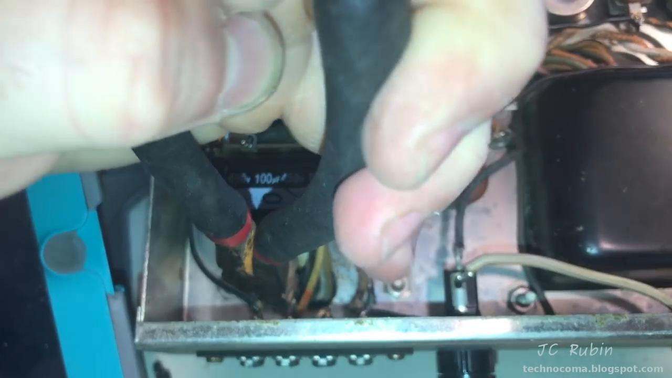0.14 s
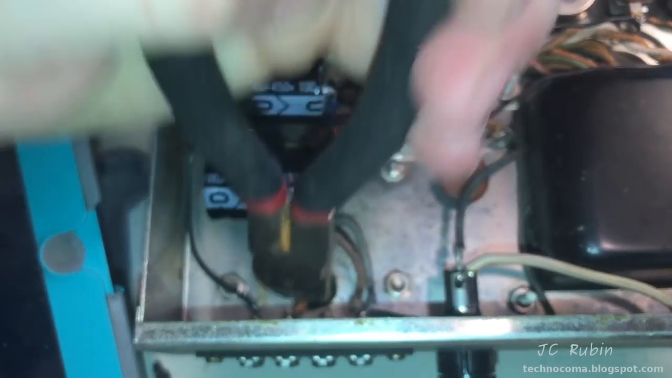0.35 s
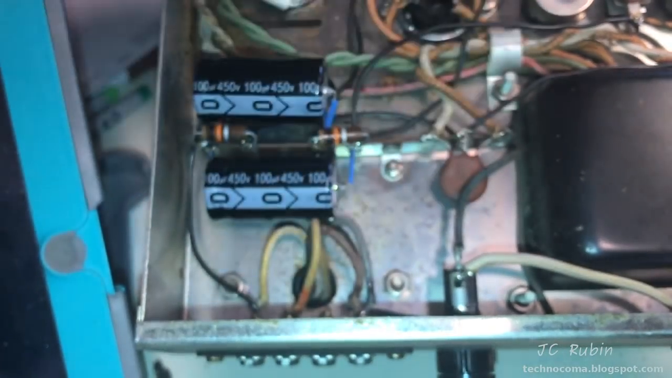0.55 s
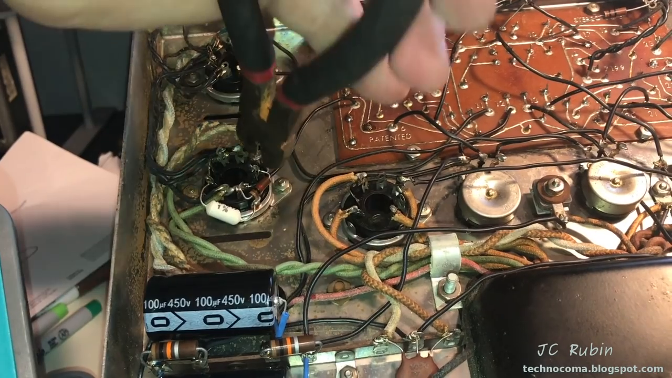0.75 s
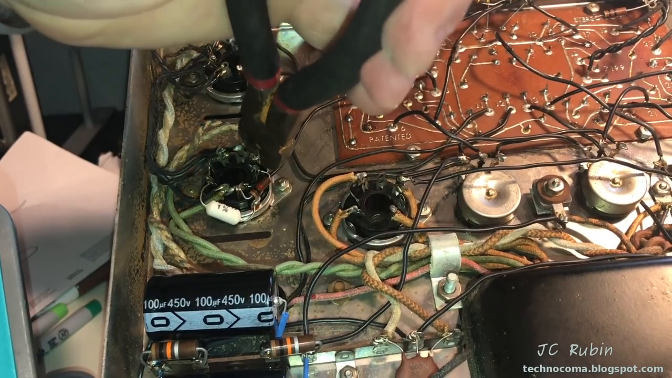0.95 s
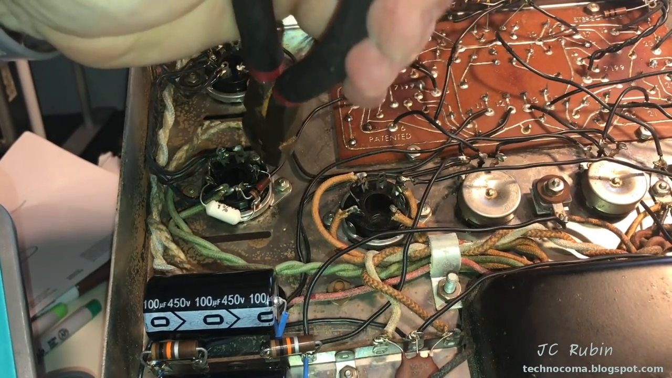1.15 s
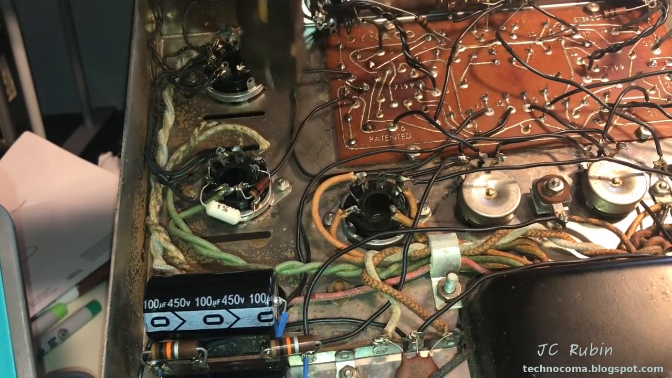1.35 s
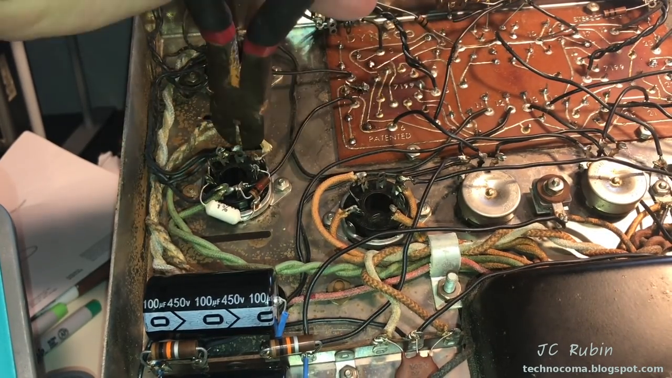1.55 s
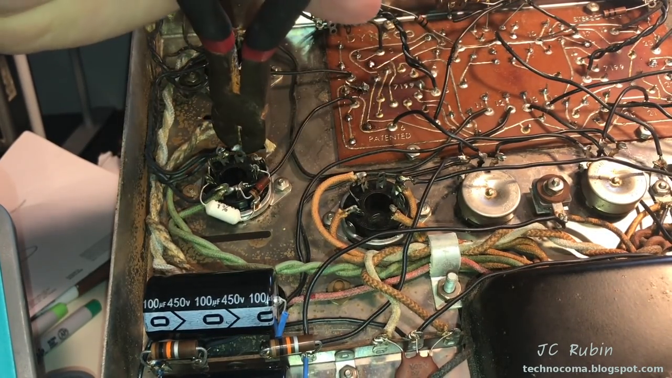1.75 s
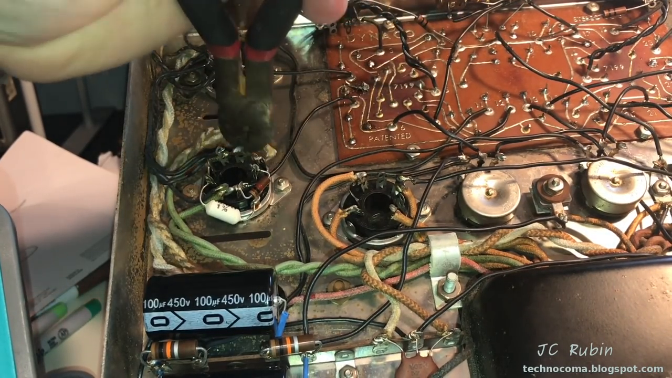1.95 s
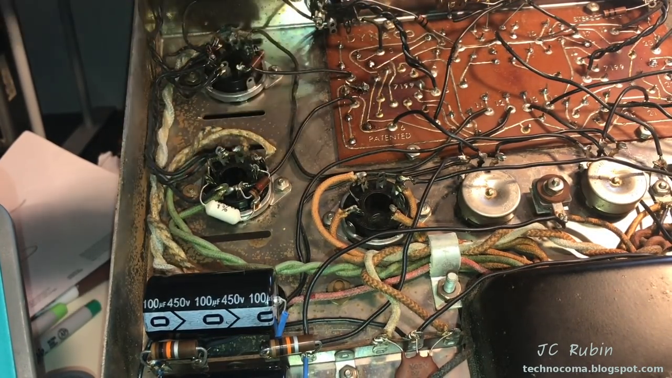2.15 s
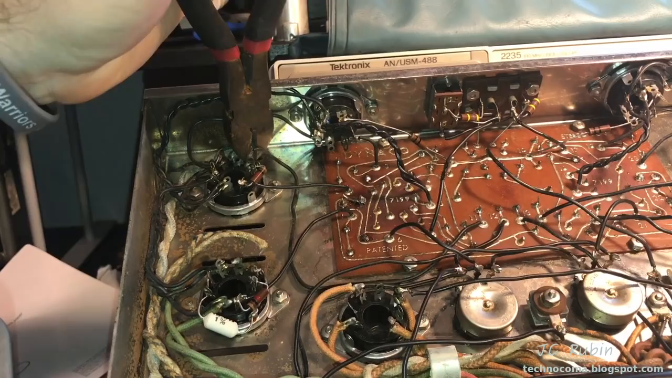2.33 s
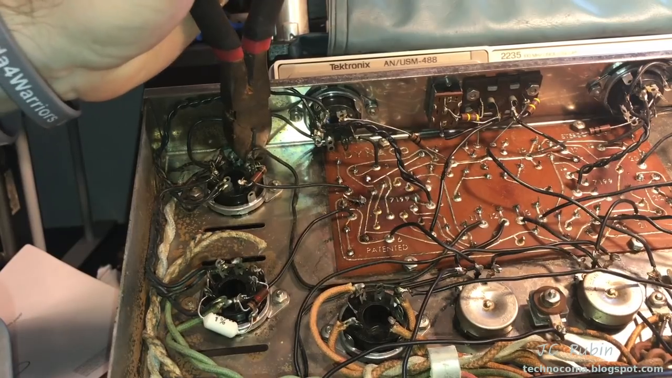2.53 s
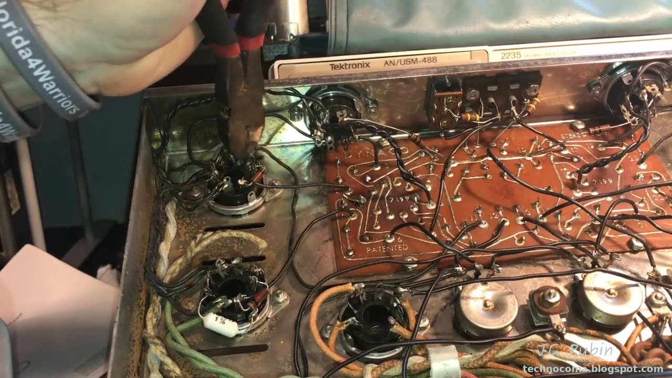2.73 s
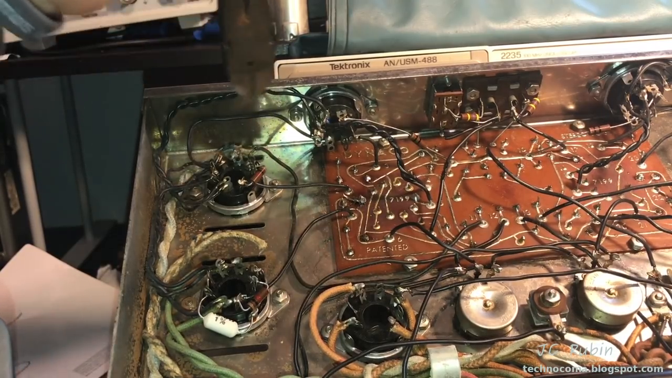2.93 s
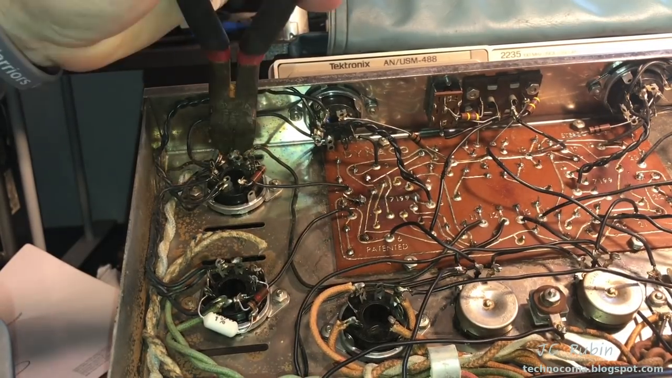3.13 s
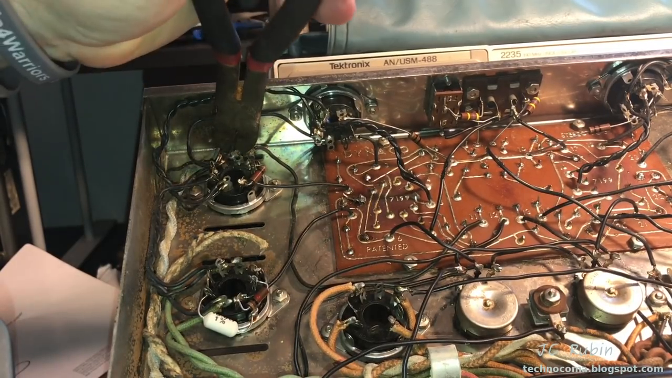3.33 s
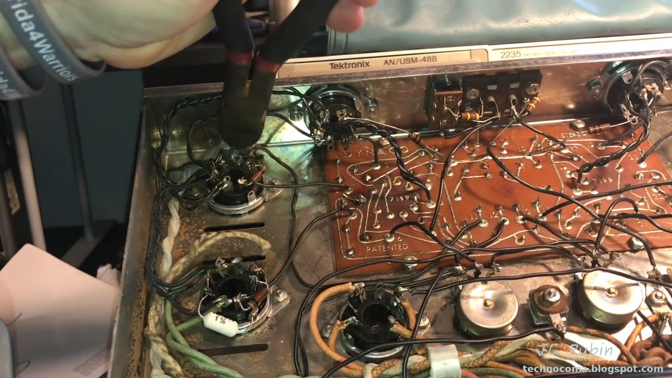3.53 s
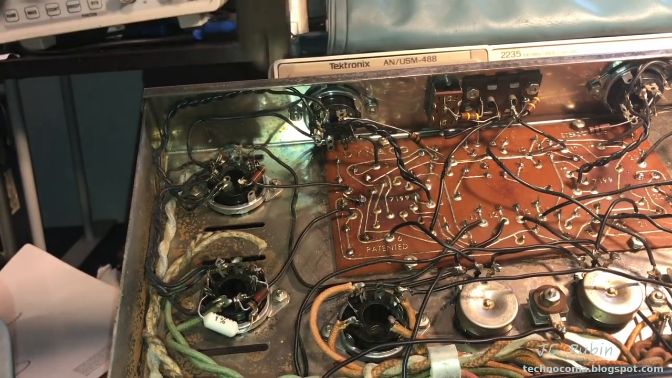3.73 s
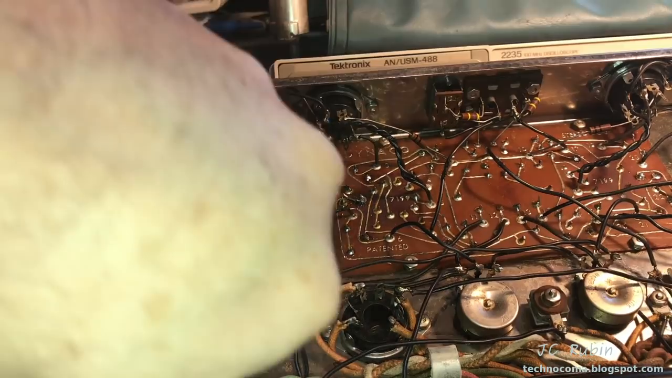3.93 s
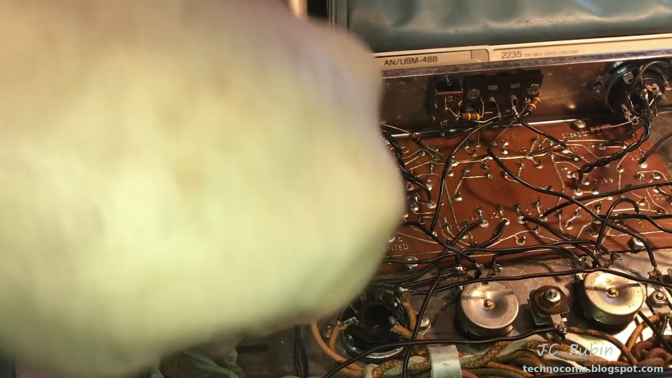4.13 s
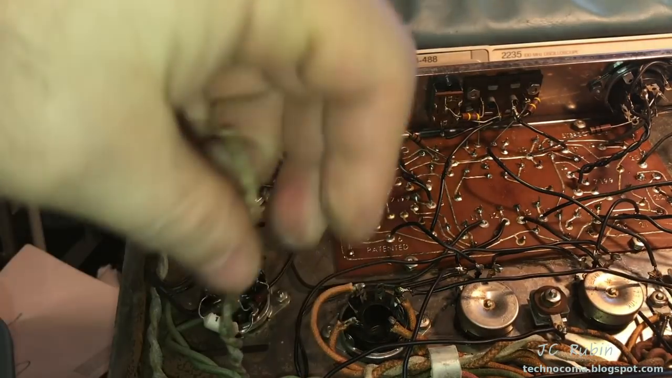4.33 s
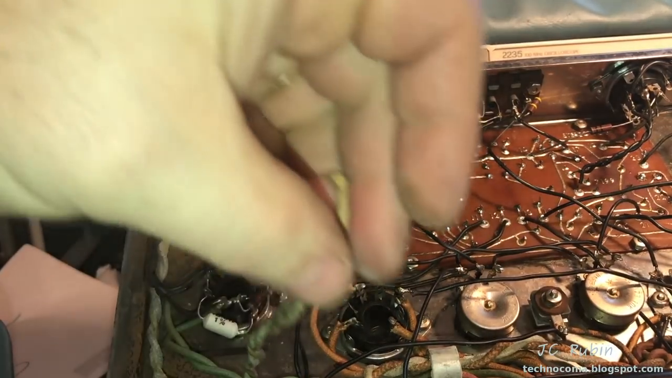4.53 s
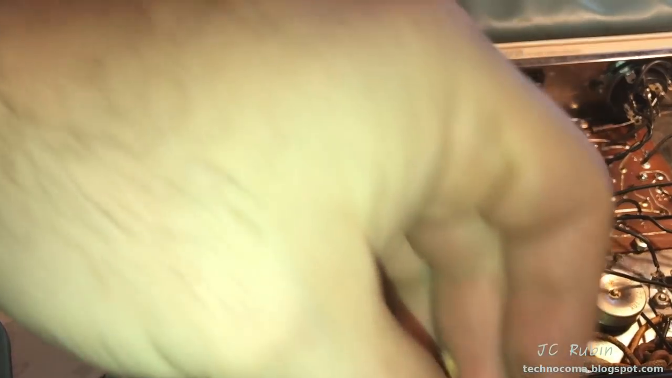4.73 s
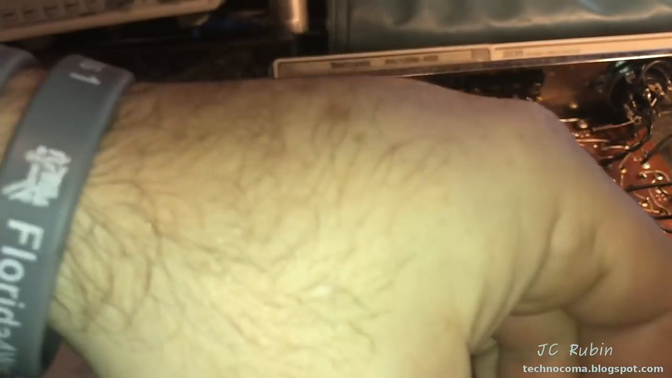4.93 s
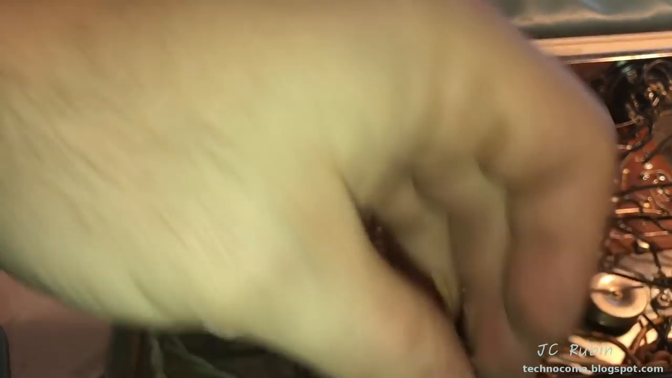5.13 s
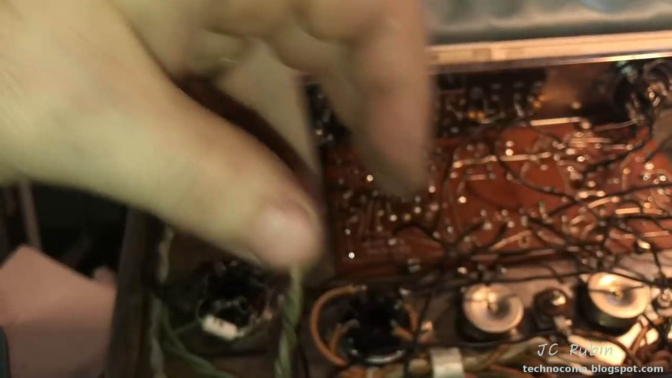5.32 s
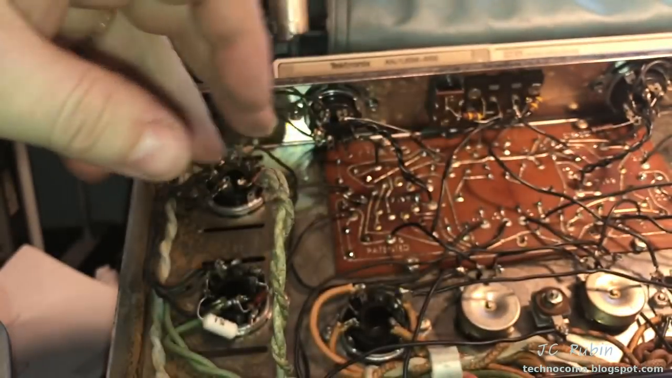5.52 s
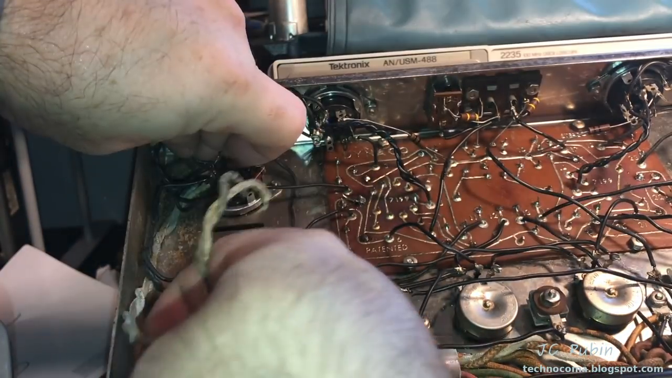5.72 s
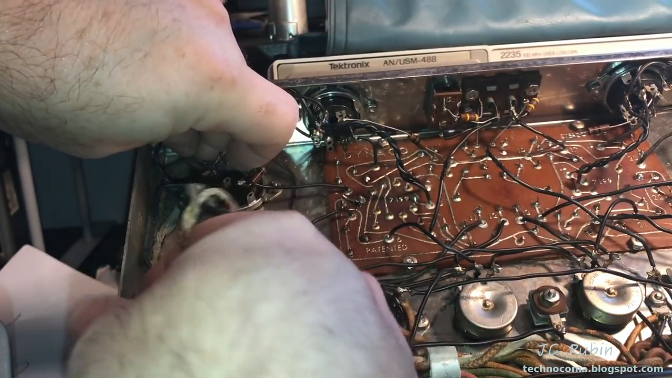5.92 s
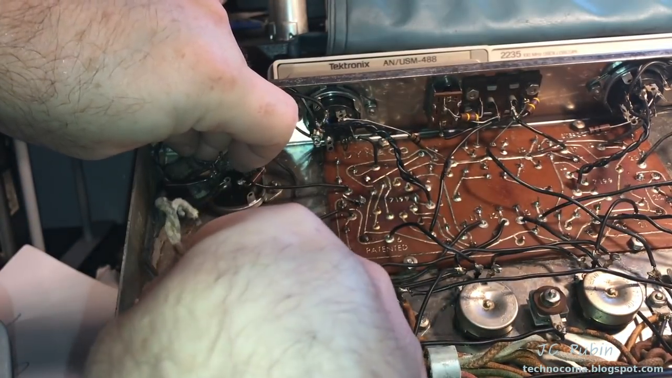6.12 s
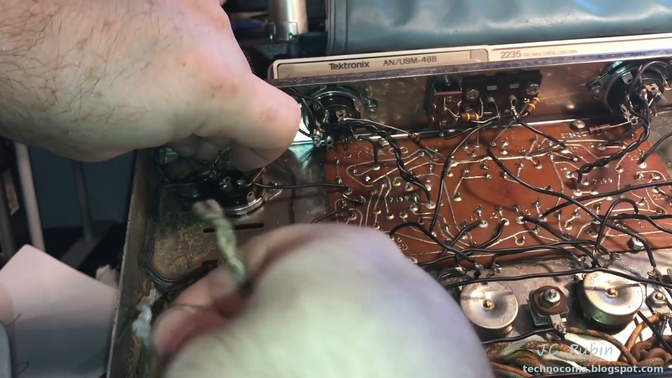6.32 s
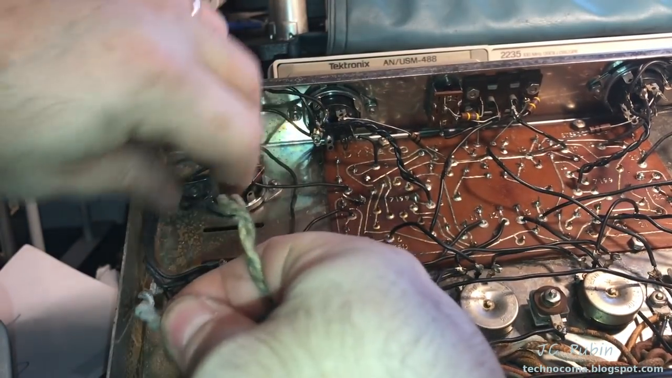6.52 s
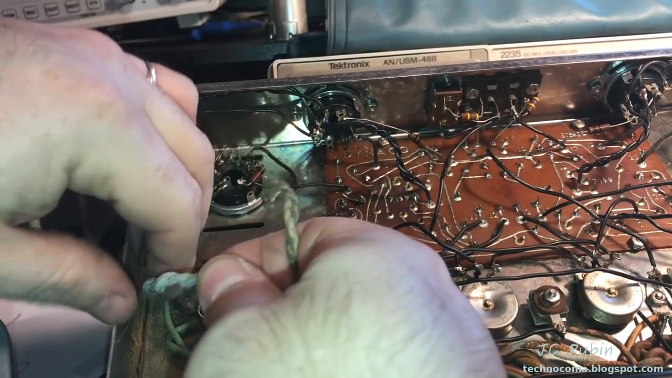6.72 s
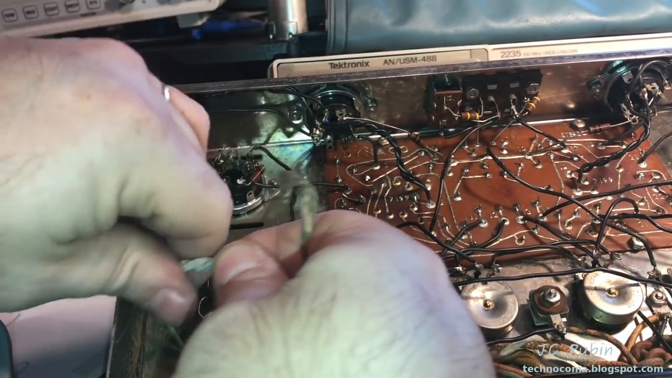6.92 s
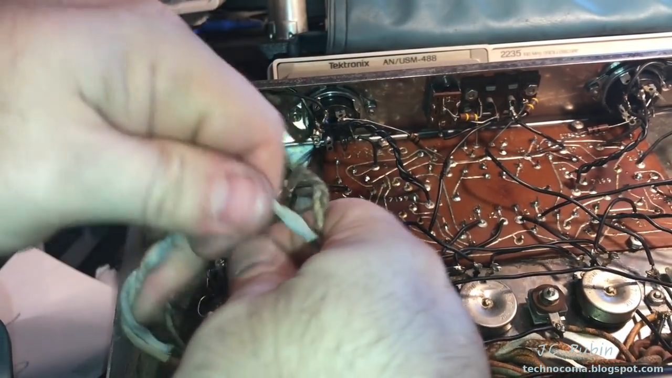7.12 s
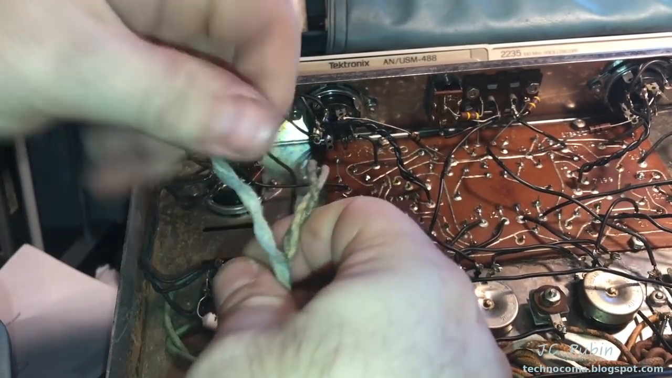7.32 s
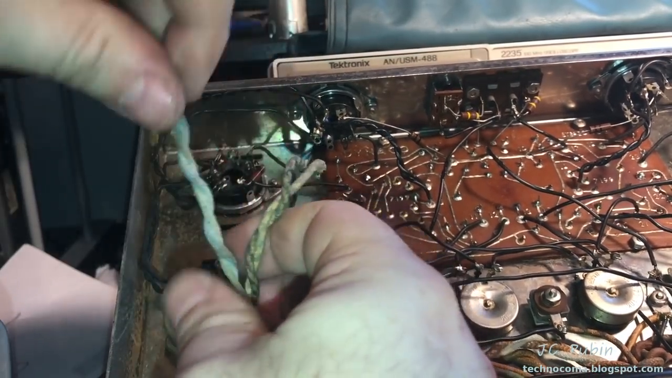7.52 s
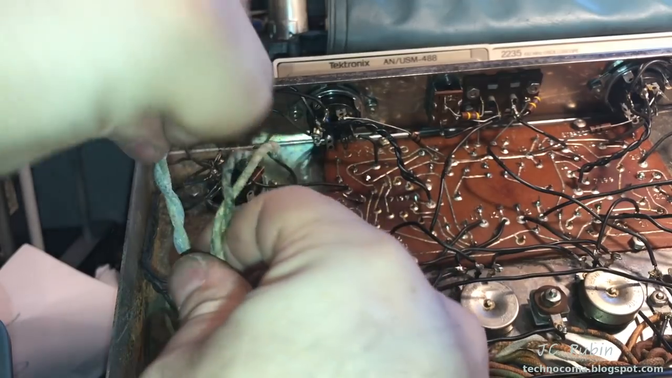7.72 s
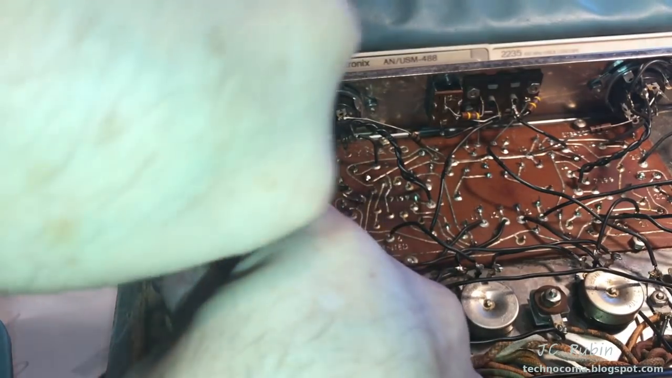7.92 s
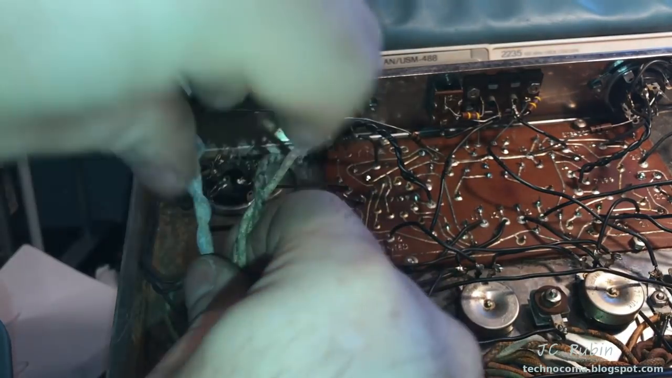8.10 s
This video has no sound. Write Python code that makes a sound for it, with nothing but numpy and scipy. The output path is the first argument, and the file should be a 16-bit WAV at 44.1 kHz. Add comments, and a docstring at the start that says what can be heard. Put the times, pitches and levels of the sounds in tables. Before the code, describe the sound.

Close-up side cutters click crisply through wires five times, followed by irregular metallic snaps, rubs and small knocks over faint mains hum.

```python
"""Snipping and pulling wires

Side cutters snip five wires in an open metal chassis on a workbench, close to a small microphone.
Fingers then pull the stiff twisted wires free: they snap, tick, scrape, twang and sing on the metal.
Blows are noise bursts and kicks through ringing modes, rubs are grains, twangs are beating sines.
Shudders of the bench, a small room's noise tails, mains hum, room air and a stepping hiss lie below.
"""
import sys
import numpy as np
from scipy import signal
from scipy.io import wavfile
from scipy.ndimage import uniform_filter1d

SR = 44100
rng = np.random.default_rng(int(sys.argv[2]) if len(sys.argv) > 2 else 0)


def transcribe(u):
    """Save the signal u as a 16-bit wav file named by the first command-line argument.

    u: samples, shape (n,) or (channels, n), limited to [-1, 1]; the rate is SR.
    q: integer samples, one column per channel.
    """
    v = np.clip(np.atleast_2d(u).T, -1, 1)
    q = np.round(v * 32767).astype(np.int16)
    wavfile.write(sys.argv[1], SR, q)


N = 364261  # length in samples

# Five snips: t/s, jaws/dB, bite/dB, clatter/dB, crack/dB, thump/dB, panel/dB, fall/ms, room/dB
# (bite, clatter and crack are relative to the jaws; room is relative to the whole blow)
CUTTER_SNIPS = [(0.2674, -13.5, -6, -2.5, -9.5, -23, -31, 3.7, -13),
                (1.1606, -18, 6.5, -8, 4, -31, -27.5, 1.9, -7.5),
                (2.0128, -19, 7.5, -11.5, -4, -31.5, -34.5, 1.87, -11),
                (2.7526, -17, 0.5, -0.5, -2, -39.5, -35, 1.9, -7),
                (3.58, -17.5, 5.5, -2.5, -3, -31, -41, 1.4, -9.5)]
HANDLES_DB, HANDLES_PER_BITE = -6, 0.99  # a harder bite rings the handles more
PIVOT_DB, TIPS_DB = -1.5, 2  # both follow the clatter
SNIP_RISE_MS = 0.3


def snips():
    """Spreads the shock of each cut over the cutters' parts, the panel and the crack in the air."""
    events = []
    for s, jaws, bite, clatter, crack, thump, panel, fall_ms, room_db in CUTTER_SNIPS:
        handles = jaws + HANDLES_DB + HANDLES_PER_BITE * bite
        pivot = jaws + clatter + PIVOT_DB
        tips = jaws + clatter + TIPS_DB
        edges = jaws + bite
        air_crack = jaws + crack
        events.append((s, jaws, thump, panel, handles, pivot, tips, edges, air_crack,
                       SNIP_RISE_MS, fall_ms, room_db))
    return events


# A strained wire tears free:
# t/s, level/dB, tilt/(dB per octave), clink/dB, panel/dB, extra crack/dB, fall/ms
WIRE_SNAPS = [(4.9797, -40, -3.5, -38, -36, -3.5, 4.04), (5.694, -28.5, -2.5, -41.5, -37.5, 4.5, 3.83),
              (6.2629, -23.5, 5.5, -14, -36.5, -5, 2.6), (6.4847, -42, -1.5, -51, -41.5, -3, 4.25),
              (6.9008, -52, -5, -43, -47, 2, 7), (7.0672, -37.5, -3, -36.5, -39.5, -4, 3.14),
              (7.1347, -25, 0, -21, -24.5, 5, 5.85)]
SNAP_RISE_SHARE = 0.46  # rise as a share of the fall time
SNAP_THUMP_DB, SNAP_TICK_DB, SNAP_ROOM_DB = -19, 2, -9.5  # thump is relative to the panel


def snaps():
    """A torn wire lets its strain go as one shock through all chassis parts; the rise follows the fall."""
    events = []
    for s, db, tilt, clink, panel, crack, fall_ms in WIRE_SNAPS:
        part_db = spread(db, tilt, clink, panel + SNAP_THUMP_DB, panel, SNAP_TICK_DB, crack)
        events.append((s, *part_db, SNAP_RISE_SHARE * fall_ms, fall_ms, SNAP_ROOM_DB))
    return events


# Wires and tool knock the chassis: t/s, level/dB, tilt/(dB per octave), panel/dB, room/dB
CHASSIS_KNOCKS = [(0.054, -59, 1, -85, -8), (0.085, -64.5, -1.5, -78, -23), (0.436, -52, -1.5, -57, -3),
                  (0.7433, -78, -9, -54.5, -22), (0.7902, -75, -3, -61.5, 5), (0.8458, -54.5, -5, -44, 0),
                  (0.9397, -74, -11, -66, -16), (1.3456, -44.5, -0.5, -49, 4),
                  (1.8004, -63.5, -3, -56.5, 0), (2.151, -57, 0, -69, -13),
                  (2.8466, -36.5, -1.5, -43.5, -6), (3.2626, -59, 7, -79, -14),
                  (3.692, -46.5, -0.5, -56, -3.5), (4.489, -65, -1.2, -54.5, -18.5),
                  (5.2385, -67, -4, -59, -17), (5.4514, -63, -4, -52.5, -2), (5.475, -55.5, -3, -56, -27),
                  (5.4779, -57.5, -3, -41.5, -3.5), (5.7541, -39.5, -1.3, -46, -9.5),
                  (5.773, -46.5, -6.5, -47.5, -2), (5.8042, -57, -0.5, -45.5, -1), (5.856, -67, -7, -56, 0),
                  (5.8261, -67, -5, -49, -12), (5.9071, -61.5, 0.4, -66, -1), (5.94, -65.5, -3.5, -54, 0.5),
                  (6.03, -67, -4, -63, 2.5), (6.1846, -48, -7.5, -48.5, 6.5), (6.4218, -55, -8, -46, 4),
                  (6.6329, -61.5, -0.5, -53, -4), (6.673, -71, -2, -53, -9), (6.6847, -62, 1, -54, -4),
                  (6.7162, -63.5, 1.2, -57.5, 9.5), (6.9702, -71, -8, -59, -3), (7.0096, -64, 1, -55, -2),
                  (7.118, -55, 4.5, -60, -12), (7.2491, -47.5, -1.5, -44, -6.5), (7.384, -61, -7, -53, -2),
                  (7.4888, -56.5, -3, -48, -15), (7.6896, -47, -4, -48, -7),
                  (7.9431, -59.5, -3.5, -78, -10), (8.0533, -65.5, -10, -56, 0),
                  (8.1083, -63, 2, -75, -4.5), (8.145, -71, 9, -77, -11)]
KNOCK_RISE_MS, KNOCK_FALL_MS, TICK_DB = 0.8, 3.1, 1
KNOCK_CLINK_DB, KNOCK_THUMP_DB = -5.5, -7.5  # clink relative to the level, thump to the panel
FAINT_DB, FAINT_SPREAD_DB, FAINT_ROOM_DB = -67.5, 0.5, -2.5  # scattered faint knocks


def knocks(faint_count):
    """Short contacts shake the chassis parts: the placed knocks plus a random scatter of faint ones."""
    faint = []
    for _ in range(faint_count):
        s = 0.05 + rng.random() * (N / SR - 0.2)
        a, b, c = rng.standard_normal(3)
        level = FAINT_DB + FAINT_SPREAD_DB * a
        panel = FAINT_DB + 4 + FAINT_SPREAD_DB * c
        faint.append((s, level, -2.5 + 1.5 * b, panel, FAINT_ROOM_DB))
    events = []
    for s, db, tilt, panel, room_db in CHASSIS_KNOCKS + faint:
        part_db = spread(db, tilt, db + KNOCK_CLINK_DB, panel + KNOCK_THUMP_DB, panel, TICK_DB, 0)
        events.append((s, *part_db, KNOCK_RISE_MS, KNOCK_FALL_MS, room_db))
    return events


# Chassis modes, grouped as rattle, thump, panel, clink, tick, air crack: f/Hz, width/Hz, level/dB
CHASSIS_PARTS = [
    [(1529, 100, -2.5), (2523, 780, 6)],
    [(245, 4.8, -1), (296.3, 320, -2), (477.2, 11, -6.5)],
    [(630, 260, -6.5), (910, 21, -4), (1000, 49, -3.5), (1250, 68, -3)],
    [(3000, 77, -0.5), (3450, 650, -1)],
    [(4330, 710, -3.5), (5760, 1200, -4), (6800, 860, -5.5)],
    [(8600, 1700, 0), (12400, 1900, 0.5), (14600, 3900, -8.5)],
]
TILT_HZ = 3993  # pivot of the tilted line


def spread(db, tilt, clink_db, thump_db, panel_db, tick_db, crack_db):
    """Levels of the chassis parts: rattle, tick and crack start from one line tilted over pitch."""
    def on_line(part):
        centre_hz = np.mean([mode[0] for mode in CHASSIS_PARTS[part]])
        return db + tilt * np.log2(centre_hz / TILT_HZ)
    return on_line(0), thump_db, panel_db, clink_db, on_line(4) + tick_db, on_line(5) + crack_db


def blows(events, parts):
    """Each blow is a short rough push that rings every part, and the room answers in the same colour."""
    t_ms = np.arange(4000) / SR * 1000
    push = np.zeros((len(parts), 1, N + 4000))
    echo = np.zeros(N + SR)
    hz = np.fft.rfftfreq(512, 1 / SR)
    colours = np.array([colour(modes, hz) for modes in parts])
    quick = np.array([[(modes[0][0] / 4000) ** 0.15] for modes in parts])  # pushes on high parts die sooner
    for s, *part_db, rise_ms, fall_ms, room_db in events:
        rise_ms, fall_ms = max(rise_ms, 0.1), max(fall_ms, 0.3)
        rise = np.minimum(t_ms / rise_ms, 1) ** 2
        shape = rise * np.exp(-np.maximum(t_ms - rise_ms, 0) * quick / fall_ms)
        size = np.linalg.norm(shape, axis=1)
        peak = round(rise_ms / 1000 * SR)
        at = round(s * SR)
        burst = rng.standard_normal(shape.shape) * shape
        # the heavy thump and panel feel one kick instead of noise
        burst[1:3] = size[1:3, None] * (np.arange(len(t_ms)) == peak)
        push[:, 0, at - peak:at - peak + len(t_ms)] += burst * amp(part_db)[:, None]
        power = (size * amp(part_db)) ** 2 @ colours
        echo[at:at + SR // 2] += amp(room_db) * room(power)
    return sum(ring(p, modes)[0] for p, modes in zip(push, parts)) + echo[:N]


# Fingers and wire insulation rub: start t/s, peak t/s, end t/s, dull part/dB, bright part/dB
# (a stroke whose end lies before its start stays silent)
RUB_STROKES = [(0.38, 0.458, 0.5, -59, -50.5), (0.78, 0.834, 1.06, -62.5, -64.5),
               (4.14, 4.371, 4.57, -72.5, -68.5), (4.97, 4.978, 4.994, -49.5, -49.5),
               (5.47, 5.485, 5.18, -53, -66), (5.655, 5.664, 5.72, -60, -51),
               (6.318, 6.324, 6.47, -53, -54.5), (6.497, 6.526, 6.56, -55, -62),
               (6.596, 6.72, 6.9, -63.5, -66), (7.114, 7.137, 7.14, -55, -51),
               (7.256, 7.398, 7.47, -61, -60.5), (7.45, 7.483, 7.7, -63, -65),
               (7.795, 7.905, 7.9, -62, -75), (8.044, 8.07, 8.12, -63.5, -70)]
# Modes of the dull panel part, then of the bright scrape: f/Hz, width/Hz, level/dB
RUB_DULL_MODES = [(706, 160, 0.5), (895, 25, -0.5), (1174, 270, -6.5)]
RUB_BRIGHT_MODES = [(1656, 190, 1), (2396, 690, -1.5), (3030, 125, -5), (3635, 300, -3), (6140, 3800, -2.5),
                    (8440, 520, -6), (12200, 4600, -1.5)]
RUB_ENDS_DB = -15.5  # level at both ends of a stroke, relative to its peak


def rubbing():
    """Stick and slip: uneven grains excite the panel and a brighter scrape; strokes swell and fade."""
    grain_db = 2.7 * rng.exponential(1, N)
    struck = rng.random(N) < 3000 / SR  # about 3000 grains a second
    grains = rng.standard_normal((2, N)) * amp(grain_db) * struck
    t, level = np.arange(N) / SR, 0
    for start, peak, end, *part_db in RUB_STROKES:
        fade = np.clip(np.minimum(t - start, end - t) / 0.004, 0, 1)
        swell = fade * amp(np.interp(t, [start, peak, end], [RUB_ENDS_DB, 0, RUB_ENDS_DB]))
        level = level + amp(part_db)[:, None] * swell
    drive = level * evened(grains)
    return ring(drive[:1], RUB_DULL_MODES)[0] + ring(drive[1:], RUB_BRIGHT_MODES)[0]


# A plucked wire hums until a finger stops it: t/s, length/s, f/Hz, level/dB (rms of the main tone at onset)
WIRE_TWANGS = [(5.451, .018, 866, -52.5), (5.480, 0.027, 902, -51.5), (6.361, 0.062, 900, -56),
               (6.422, 0.029, 883, -55), (7.392, .025, 890, -58), (7.487, 0.033, 883, -59),
               (7.69, 0.028, 879.8, -57.5), (8.054, 0.055, 881, -53.5)]
TWANG_FADE_DB_PER_S, TWANG_STOP_S = -63, 0.005
TWANG_BEAT_HZ, TWANG_BEAT = 45, 0.26  # offset and relative strength of the second tone


def twangs():
    """Two close tones beat from a near-instant onset, lose level and are damped at the end."""
    t, out = np.arange(N) / SR, 0
    for s, length, hz, db in WIRE_TWANGS:
        since = t - s
        gate = np.clip(np.minimum(since / 0.001, (length - since) / TWANG_STOP_S), 0, 1)
        fade = amp(db + TWANG_FADE_DB_PER_S * np.clip(since, 0, length))
        main = np.sin(2 * np.pi * hz * since)
        second = np.sin(2 * np.pi * ((hz + TWANG_BEAT_HZ) * since + rng.random()))
        out = out + np.sqrt(2) * gate * fade * (main + TWANG_BEAT * second)
    return out


# A wire slides over a metal edge and sings thinly: start t/s, end t/s, level/dB (at the top of the swell)
WIRE_SLIDES = [(6.655, 6.86, -65.5), (4.25, 4.5, -78)]
# Narrow rings of the slide: f/Hz, width/Hz, level/dB
SLIDE_MODES = [(2330, 70, -1.5), (2970, 55, -1), (3650, 130, -3), (4450, 38, -5), (5280, 42, -7),
               (6230, 150, -4)]


def slides():
    """Fine friction noise excites narrow rings, swelling and fading."""
    t, level = np.arange(N) / SR, 0
    for on, off, db in WIRE_SLIDES:
        along = np.clip((t - on) / (off - on), 0, 1)
        level = level + amp(db) * np.sin(np.pi * along) ** 0.66
    return ring(level * rng.standard_normal((1, N)), SLIDE_MODES)[0]


# Shudders under the handling: t/s, bench/dB, chassis floor/dB, t60/s
BENCH_SHUDDERS = [(0.272, -41.5, -42.5, 0.25), (0.845, -59, -43, 0.46), (3.582, -42, -54, 0.17),
                  (4.985, -52, -64, 0.45), (5.669, -44.5, -56.5, 0.32), (7.136, -37.5, -41.5, 0.19),
                  (7.265, -51, -59, 0.7)]
# Low modes of the bench, then of the chassis floor: f/Hz, width/Hz, level/dB
BENCH_MODES = [(57.9, 30, 0.5), (128, 8.8, 3.5), (151, 15, -12.5)]
FLOOR_MODES = [(236, 42, 2.5), (284, 32, -7.5)]
SHUDDER_RISE_S, SHUDDER_KICK_DB = 0.009, 19  # kick is relative to the shake


def bench():
    """One kick, then a dying random shake in the low modes of the bench and of the chassis floor."""
    t, level, kicks = np.arange(N) / SR, 0, np.zeros((2, N))
    for s, *part_db, t60 in BENCH_SHUDDERS:
        since = np.maximum(t - s, 0)
        swell = np.minimum(since / SHUDDER_RISE_S, 1) * amp(-60 * since / t60)
        level = level + amp(part_db)[:, None] * swell
        kicks[:, round(s * SR)] = amp(part_db) * amp(SHUDDER_KICK_DB)
    shake = level * rng.standard_normal((2, N)) + kicks
    return ring(shake[:1], BENCH_MODES)[0] + ring(shake[1:], FLOOR_MODES)[0]


# Decay and colour of the small room: f/Hz, t60/s, level/dB
ROOM_BANDS = [(144.3, 0.23, -8.5), (393.3, 0.24, 4), (980, 0.26, 2), (3000, .22, -0.5), (4200, 0.31, -2.5),
              (8000, 0.3, -2), (11000, 0.27, -4), (15000, 0.34, -3.5)]


def room(power):
    """One fresh diffuse tail coloured by the given band powers; each band dies at its own speed."""
    hz, t, z = signal.stft(rng.standard_normal(SR // 2), SR, nperseg=512)
    t60 = read(ROOM_BANDS, hz)[:, None]
    band_db = read(ROOM_BANDS, hz, axis=2)[:, None]
    z = z * np.sqrt(power)[:, None] * amp(band_db - 60 * t / t60)
    tail = signal.istft(z, SR, nperseg=512)[1][:SR // 2]
    # the first echoes need a few ms
    tail = tail * np.clip((np.arange(len(tail)) / SR - 0.003) / 0.0033, 0, 1)
    return tail * np.sqrt(power.mean()) / np.linalg.norm(tail)


# Mains lines: f/Hz, level/dB (rms before the waver)
HUM_LINES = [(59.2, -66.5), (118.4, -67.5), (236.9, -73.5), (296.1, -75.5)]


def hum():
    """Mains lines as steady sines, each wavering a little in level."""
    t, out = np.arange(N) / SR, 0
    slow = uniform_filter1d(rng.standard_normal((len(HUM_LINES), N // 441 + 2)), size=8, axis=1)
    for (hz, db), drift in zip(HUM_LINES, slow):
        waver_db = 1.9 * np.interp(t, np.arange(len(drift)) / 100, evened(drift))
        out = out + np.sqrt(2) * amp(db + waver_db) * np.sin(2 * np.pi * (hz * t + rng.random()))
    return out


# Steps of the hiss: from t/s, to t/s, level/dB (rms)
HISS_SPANS = [(0.233, 0.672, -70), (0.67, 0.74, -76.5), (1.135, 1.57, -66.5), (1.988, 2.387, -68),
              (2.753, 3.161, -69), (3.21, 3.985, -69.5), (5.677, 6.1, -71), (6.099, 6.188, -72),
              (6.161, 6.66, -70), (6.77, 7.559, -72.5)]
# Relative spectrum of the hiss: f/Hz, level/dB (per Hz)
HISS_SPECTRUM = [(300, -31.5), (900, 3.5), (4000, 3), (9500, -1.5), (10400, -7.5), (11500, -1),
                 (15750, -3.5), (16100, -30.5)]


def hiss():
    """A patchy noise that steps on and off with short ramps; overlapping steps add up."""
    t = np.arange(N) / SR
    level = sum(amp(db) * (t > on) * (t < off) for on, off, db in HISS_SPANS)
    return uniform_filter1d(level, size=200) * noise(HISS_SPECTRUM, patchy_db=3.0)


# Relative spectrum of the room air: f/Hz, level/dB (per Hz)
AIR_SPECTRUM = [(18, -61.5), (33, -25.5), (55, -1.5), (85, -17), (130, -10), (300, -12.5), (420, -22),
                (900, -25), (2200, -32.5), (5000, -40), (15750, -46), (16100, -71)]


def air():
    """A steady, low-heavy noise bed at -65.5 dB rms."""
    return amp(-65.5) * noise(AIR_SPECTRUM, patchy_db=0.6)


def noise(spectrum, patchy_db):
    """Noise of rms 1 with a given spectrum and drifting patches in time and pitch."""
    hz = np.fft.rfftfreq(2048, 1 / SR)
    real, imag, patches = rng.standard_normal((N // 512 + 5, 1025, 3)).T
    patches = uniform_filter1d(patches, size=30, axis=0)
    patches = evened(uniform_filter1d(patches, size=4, axis=1))
    z = (real + 1j * imag) * amp(read(spectrum, hz)[:, None] + patchy_db * patches)
    return evened(signal.istft(z, nperseg=2048, noverlap=1536)[1][:N])


def ring(x, modes):
    """Passes x through decaying sine modes, wider ones dying sooner; white noise keeps its level."""
    t, body = np.arange(4096) / SR, 0
    for k, (hz, width, db) in enumerate(modes):
        decay = np.exp(-np.pi * width * t)
        sign = (-1) ** k  # neighbours alternate in polarity
        body = body + sign * amp(db) * np.sqrt(width) * decay * np.sin(2 * np.pi * hz * t)
    return signal.oaconvolve(x, body[None] / np.linalg.norm(body), axes=1)[:, :N]


def colour(modes, hz):
    """Power spectrum of a set of modes as a sum of resonance peaks, mean 1."""
    power = sum(amp(db) ** 2 * width / ((width / 2) ** 2 + (hz - f) ** 2) for f, width, db in modes)
    return power / power.mean()


def read(points, hz, axis=1):
    """Reads one column of a table on a log-frequency axis."""
    table = np.transpose(points)
    return np.interp(np.log(hz + 1), np.log(table[0] + 1), table[axis])


def amp(db):
    """Gain of a level in dB."""
    return 10 ** (np.asarray(db) / 20)


def evened(x):
    """Scales to rms 1."""
    return x / np.sqrt(np.mean(x ** 2) + 1e-20)


# Modes the cutters and the cut wire ring with: f/Hz, width/Hz, level/dB
# (grouped as jaws, thump, panel, handles, pivot, tips, edges, air crack)
CUTTER_PARTS = [
    [(4185, 250, 1), (4770, 680, -4.5)],
    [(258, 120, -1), (392, 65.6, -2), (533, 180, -13)],
    [(995, 33, 0), (1217.5, 76, 2.5)],
    [(1740, 60, 1.5), (2360, 400, -4)],
    [(2494, 350, -3), (2983, 50, -2.5), (3480, 220, -4.5)],
    [(5550, 290, 3.5), (6300, 710, -0.5)],
    [(7160, 810, -6.5), (8330, 540, -3.5), (9540, 700, -9.5)],
    [(11020, 140, -1.5), (12500, 1600, 5), (14400, 1500, -0.5), (15685, 640, 1)],
]


def scene():
    """Blows and rubbing with their room, over bench shudders, hum, air and hiss."""
    hits = blows(snips(), CUTTER_PARTS)
    hits = hits + blows(snaps() + knocks(faint_count=10), CHASSIS_PARTS)
    rub = rubbing() + twangs() + slides()
    rub_echo = amp(-14) * signal.fftconvolve(rub, room(np.ones(512 // 2 + 1)))[:N]
    still = hum() + air() + hiss()
    return (hits + rub + rub_echo + bench() + still)[None]


def record(dry):
    """The small microphone loses the deepest bass and rounds off the loudest peaks; then the band limit."""
    thin = signal.sosfilt(signal.butter(3, 42, "high", fs=SR, output="sos"), dry)
    top = amp(-4)  # ceiling of the soft clipping
    soft = top * np.tanh(thin / top)
    band_limit = signal.firwin(191, 16520, window=("kaiser", 9), fs=SR)  # low-pass, edge in Hz
    return signal.oaconvolve(soft, band_limit[None], "same")


dry = scene()
out = record(dry)
transcribe(out)
```